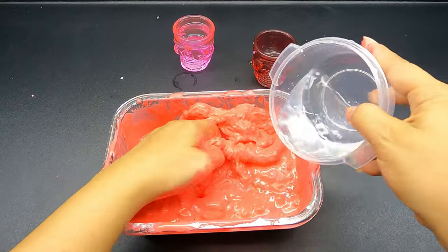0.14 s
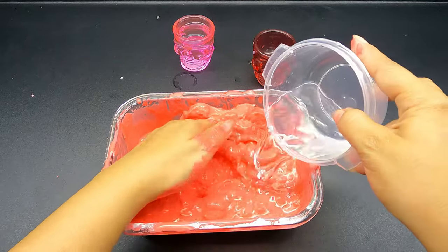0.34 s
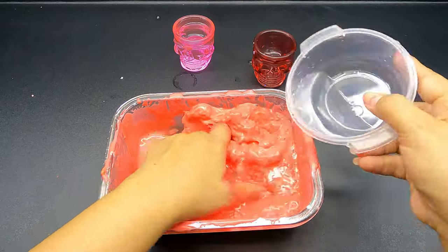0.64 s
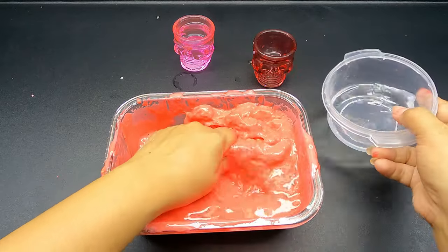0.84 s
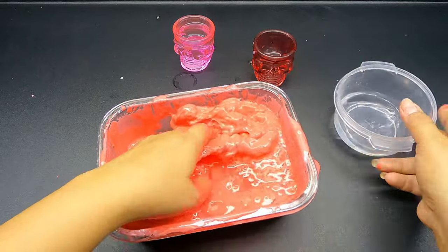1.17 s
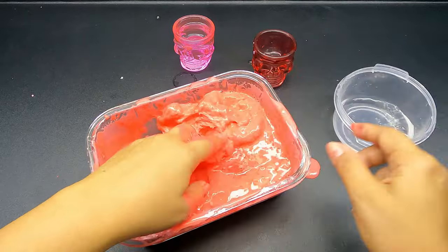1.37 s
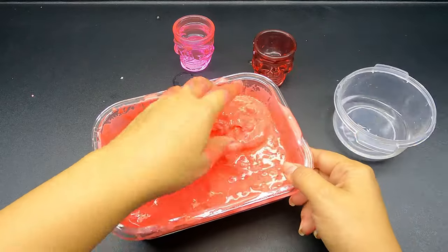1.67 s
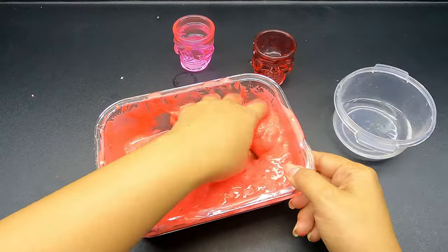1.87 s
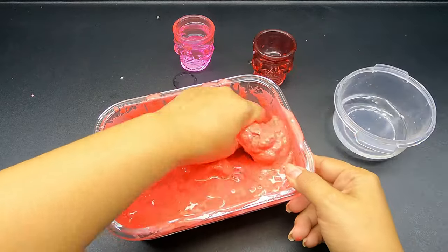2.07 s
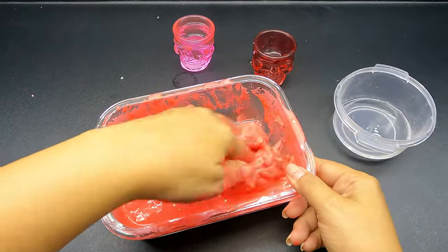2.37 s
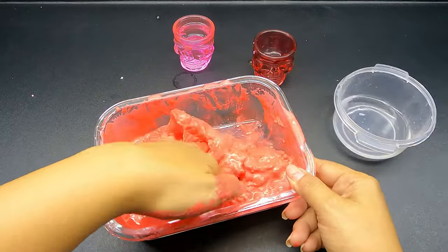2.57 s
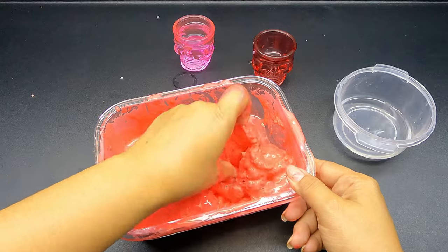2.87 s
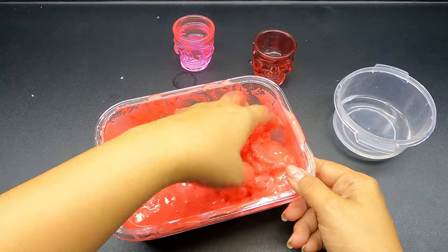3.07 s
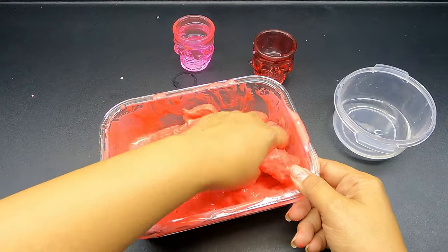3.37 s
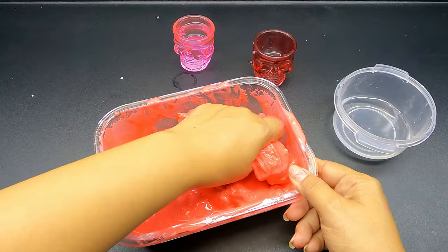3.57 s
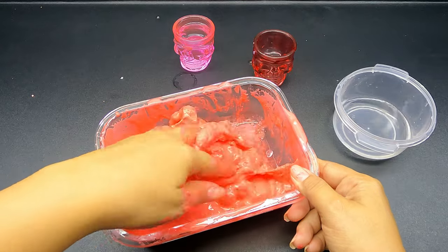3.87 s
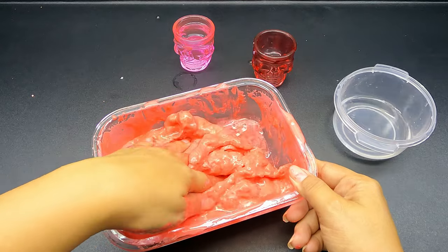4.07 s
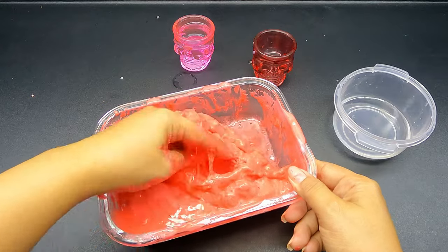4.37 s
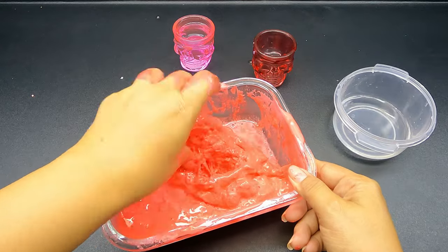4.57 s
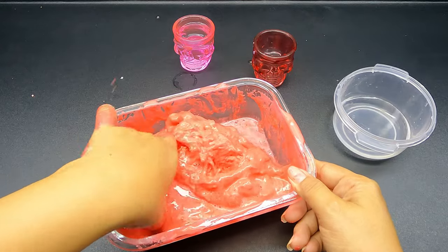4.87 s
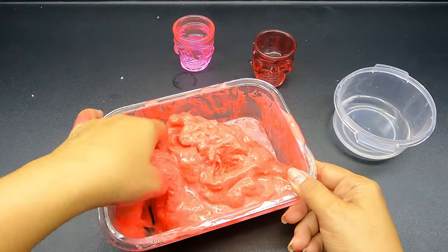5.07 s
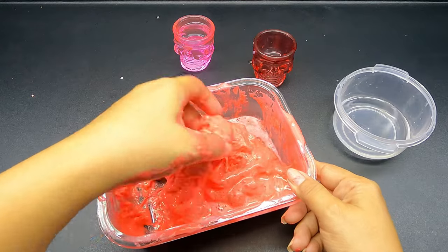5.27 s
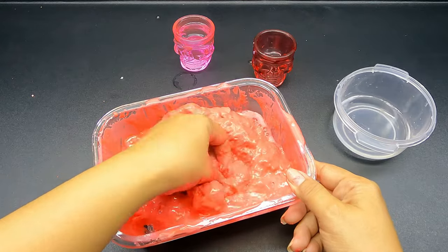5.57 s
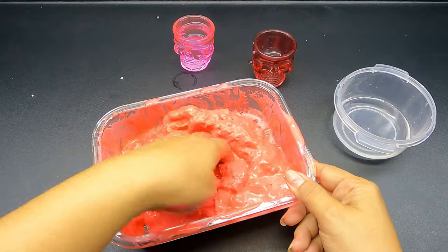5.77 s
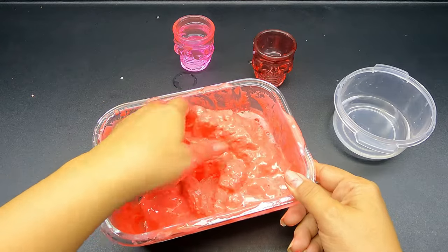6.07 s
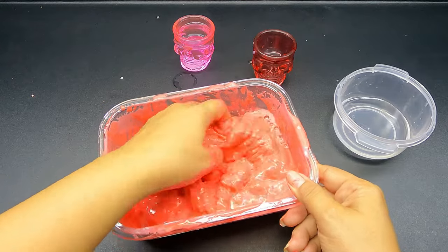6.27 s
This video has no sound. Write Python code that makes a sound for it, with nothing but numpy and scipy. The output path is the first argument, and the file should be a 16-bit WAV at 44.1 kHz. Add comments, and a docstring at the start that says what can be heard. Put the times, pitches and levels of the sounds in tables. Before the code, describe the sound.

Hands knead wet, sticky slime in a glass dish, heard very close in stereo in a small quiet room with a faint hush and short reverberation. Soft clicks and pops open at 0.1-0.25 s, then a lull. From 0.75 s squelches build, with pops near 1 s and a dense wet cluster of plops, snaps and low table bumps at 1.2-1.55 s. A sharp pop comes at 2.2, then deeper plops with a knock and drag at 2.33-2.4. Lighter gurgles and clicks follow, with a bright snap at 2.94. Small pops and fizzing crackles run 3.4-3.9, another snap at 4.13 and strong pops around 4.5. A heavy low boom lands at 4.93, a smaller bump and plop at 5.23. A sharp snap at 5.65 leads to the loudest crackling bursts at 5.9-6.0, then fading squelches, a low drag and a final bump near 6.4.

```python
"""Wet slime is kneaded by hand in a glass dish on a hollow table, close to a stereo microphone in a small quiet room.
Air pockets burst as short rising rings, sticky films tear as bright noise bursts, and under every squeeze
showers of tiny damped rings gurgle and fizz. The dish and a plastic bowl bump and drag on the table,
whose top booms in decaying modes. Noise tails make the room answer, over a faint hush."""
import sys
import numpy as np
from scipy import signal
from scipy.fft import rfft, irfft, next_fast_len
from scipy.io import wavfile
from scipy.ndimage import uniform_filter1d

SR = 44100
rng = np.random.default_rng(int(sys.argv[2]) if len(sys.argv) > 2 else 0)


def materialize(psi):
    """Save the field psi as 16-bit PCM at rate SR to the path in sys.argv[1].

    A 1-D psi becomes a single channel; in a 2-D psi each row is a channel.
    """
    bounded = np.clip(np.atleast_2d(psi).T, -1, 1)
    quanta = np.round(bounded * 32767).astype(np.int16)
    wavfile.write(sys.argv[1], SR, quanta)


def elevation(decibels):
    """Turn decibel levels (scalar or array-like) into linear amplitude ratios."""
    levels = np.asarray(decibels, float)
    return 10 ** (levels / 20)


N = 283563  # length in samples
LEAD = 0.03  # room for a swell before its peak (s)


def unit(x):
    """Scaled to rms 1."""
    return x / np.sqrt(np.mean(x ** 2) + 1e-20)


def along(points, hz):
    """(Hz, value) points joined on a log frequency axis."""
    point_hz, value = np.transpose(points)
    return np.interp(np.log(hz + 1), np.log(point_hz + 1), value)


def filtered(x, response):
    """x shaped by a gain that is a function of frequency."""
    size = next_fast_len(x.shape[-1] + 2 * SR)
    spectrum = rfft(x, size) * response(np.fft.rfftfreq(size, 1 / SR))
    return irfft(spectrum, size)[..., :x.shape[-1]]


def add(track, s, sound):
    """Lays a sound into a track at a time in seconds."""
    start = round(s * SR)
    track[..., start:start + sound.shape[-1]] += sound


def sides(pan_db):
    """Left and right gains, pan_db apart."""
    return elevation(np.array([[0.5], [-0.5]]) * pan_db)


def lump(t, swell_ms, fade_ms):
    """Envelope that swells up to t = 0 and fades after, with time constants in ms."""
    time_ms = np.where(t < 0, max(swell_ms, 0.1), max(fade_ms, 0.3))
    return np.exp(-np.abs(t) * 1000 / time_ms)


def strokes(rows, rise_db_per_s, fall_db_per_s):
    """Level curves (dB) of strokes that rise, hold and fall; overlapping ones add in power."""
    rest_db = -76  # floor between strokes
    t = np.arange(0, N, 32)[:, None] / SR
    start, hold, *levels = np.transpose(rows)
    before = np.clip(start - t, 0, None)
    after = np.clip(t - start - hold, 0, None)
    off_db = rise_db_per_s * before + fall_db_per_s * after
    curves = []
    for db in levels:
        power = np.sum(elevation(db - off_db) ** 2, 1) + elevation(rest_db) ** 2
        curves.append(np.interp(np.arange(N) / SR, t[:, 0], 10 * np.log10(power)))
    return curves


def plops():
    """A bursting pocket rings as a small cavity whose pitch rises as it opens; the wet walls make the ring ragged."""
    # Air pockets bursting, and just after the bumps at 2.33 s and 5.23 s a few rows of the bumped dish
    # rattling. Each row: peak time in seconds, level in dB, cavity pitch at the peak in Hz, # length in ms.
    bursts = [(0.1535, -27.5, 1410, 0.82), (0.1808, -37.5, 1300, 2.3), (0.198, -37.5, 1390.0, 1.3),
              (0.224, -38.5, 1800, 1.6), (0.7407, -39.5, 1430, 3.3), (0.8213, -34, 1570.0, 2.5),
              (0.907, -39, 1520.0, 3.1), (0.9186, -33.5, 1840, 1.7), (0.9216, -36, 1530.0, 1.1),
              (0.9503, -32, 1300, 2.7), (0.9696, -29.7, 1680, 2.2), (0.979, -22.8, 1657, 2.2),
              (0.9967, -28.5, 1700, 1.5), (1.046, -29.5, 1520.0, 2.6), (1.11, -39, 1500, 1.5),
              (1.1225, -38, 1520, 2.5), (1.1707, -30.5, 1330, 2.3), (1.2169, -19.5, 1390, 0.82),
              (1.2939, -30, 1510, 3.6), (1.3646, -29.2, 1380, 1.4), (1.3882, -19, 1240, 4.7),
              (1.409, -28.4, 1640, 1.6), (1.4129, -26, 1610, 2.0), (1.4327, -29.5, 1340, 4.7),
              (1.5208, -28.5, 1550, 1.3), (1.562, -30, 1780, 0.88), (2.1213, -33.5, 1680, 0.9),
              (2.1407, -30.5, 1560, 2.4), (2.1796, -33, 1350, 2.5), (2.1897, -14.5, 1610, 1.2),
              (2.194, -23, 1420, 0.57), (2.3321, -21.5, 976, 5.8), (2.336, -25, 1000, 2.5),
              (2.3714, -23, 1150, 2.7), (2.5237, -34, 1270, 1.3), (2.5454, -33.5, 1660, 2.4),
              (2.6337, -38.5, 1620, 1.9), (2.636, -35, 1200, 1.0), (2.6704, -35, 1400, 1.1),
              (2.6985, -37.5, 1540, 1.9), (2.779, -34.5, 1650, 1.2), (2.9387, -31.5, 1445, 2.8),
              (3.0796, -35.5, 1175, 4.4), (3.17, -34, 1820, 2.5), (3.325, -43.5, 1430, 3.6),
              (3.3679, -42, 1630, 2.8), (3.4145, -27, 1680, 4.7), (3.423, -30, 1540, 3.4),
              (3.502, -27, 1603, 4.1), (3.599, -27, 1500, 6.6), (3.6125, -24.5, 1645, 2.9),
              (3.7638, -31, 1330, 1.4), (3.7968, -23, 1590, 2.9), (3.8002, -26, 1140, 2.3),
              (3.8654, -35.5, 1260.0, 3.8), (4.0146, -38, 1750.0, 0.81), (4.0276, -34, 1240.0, 1.8),
              (4.1269, -30, 1850, 1.8), (4.4045, -33.9, 1440.0, 3.1), (4.4441, -30, 1250, 3.3),
              (4.4571, -24, 1350, 0.61), (4.4972, -19, 1607, 3.1), (4.6124, -28.5, 1850.0, 2.5),
              (4.829, -45, 1176, 5.9), (4.9007, -34.5, 1900, 1.2), (4.936, -30.5, 1050, 1.5),
              (5.2002, -36, 1160.0, 1.3), (5.23, -26, 1050, 3.6), (5.553, -36.5, 1940, 2.1),
              (5.6277, -37.5, 1830, 1.4), (5.652, -34, 1446, 3.4), (5.8082, -26, 1440.0, 2.7),
              (5.8921, -25, 1283, 3.3), (5.8974, -24, 1640.0, 0.54), (5.9375, -25, 1560, 0.92),
              (5.94, -21.1, 1347, 3.5), (5.9716, -36, 1300.0, 1.6), (5.974, -16.5, 1200, 1.7),
              (5.9781, -19, 1160.0, 0.59), (6.3426, -34.5, 1760, 3.8)]
    out = np.zeros((2, N + SR))
    t = np.arange(SR // 10) / SR - LEAD
    random = rng.standard_normal((len(bursts), 2, len(t)))
    for (s, db, hz, length_ms), jag in zip(bursts, random):
        slip = unit(uniform_filter1d(jag[0], size=50))
        ring = np.sin(2 * np.pi * hz * (t + 4 * t * t) + 0.96 * slip)
        shape = lump(t, swell_ms=0.22 * length_ms, fade_ms=length_ms)
        pan_db = jag[1, 0]
        add(out, s - LEAD, elevation(db) * sides(pan_db) * ring * shape)
    return out[:, :N]


def snaps():
    """A tearing film is a burst of crackle, brightest around a pitch set by its size."""
    # Sticky films tearing. Each row: peak time in seconds, level in dB, centre in Hz, breadth in octaves,
    # length in ms.
    tears = [(0.0523, -43, 4280, 0.89, 1.2), (0.1243, -40, 8380.0, 0.52, 1.6),
             (0.1543, -34.5, 4100, 0.73, 1.3), (0.1698, -30.2, 7500, 0.17, 0.95),
             (0.18, -26, 7200, 0.46, 1.1), (0.1981, -29, 4640, 0.36, 1.1), (0.238, -28.3, 4400, 0.53, 1.3),
             (0.555, -46, 5800, 0.37, 1.4), (0.6534, -40.5, 5600, 0.2, 1.5),
             (0.7404, -40.5, 6700, 0.34, 1.2), (0.7732, -38, 5320.0, 0.23, 0.8),
             (0.816, -31, 7800, 0.33, 1.3), (0.9437, -35, 3480.0, 0.7, 0.86), (0.969, -30, 3350, 0.65, 1.8),
             (1.0347, -37.5, 5100, 0.54, 1.7), (1.1442, -36.5, 6150.0, 0.43, 0.7),
             (1.17, -28.5, 3060, 0.42, 1.3), (1.1913, -26, 5200, 0.62, 1.0), (1.2154, -38, 2960, 0.44, 2.2),
             (1.253, -36, 5240.0, 0.65, 2.4), (1.2916, -32.5, 3900, 0.52, 3.8),
             (1.3314, -35.5, 2960, 0.45, 4.3), (1.3505, -31, 4250.0, 0.31, 1.6),
             (1.364, -28.5, 4000, 0.47, 2.6), (1.3863, -17, 5100, 1, 1.6), (1.4084, -28, 3580, 0.43, 1.8),
             (1.5215, -28, 4250, 0.98, 2), (1.5608, -25, 5460, 1, 2.8), (2.1885, -23, 3870, 0.2, 1.24),
             (2.3393, -30.5, 7040, 0.6, 1.9), (2.3845, -30.5, 7150.0, 0.54, 2.3),
             (2.397, -31.5, 7580.0, 0.49, 1.8), (2.546, -43, 2860, 0.2, 2.2),
             (2.6342, -38.5, 3620, 0.39, 1.1), (2.6985, -32.5, 3380, 0.47, 0.87),
             (2.7785, -29, 3940, 0.43, 0.8), (2.8609, -40, 3100, 0.42, 1.2),
             (2.9389, -22.5, 5880, 0.37, 1.3), (2.9421, -35, 6410.0, 0.81, 0.88),
             (3.324, -43, 3960, 0.84, 2.9), (3.3285, -34.5, 5100, 0.76, 0.52),
             (3.4, -36.5, 5320.0, 0.52, 1.5), (3.4705, -35.5, 3300, 0.26, 1.4),
             (3.5, -39, 5530.0, 0.31, 1.4), (3.5069, -42, 5910.0, 0.39, 1.1),
             (3.5194, -30, 6640, 0.33, 0.95), (3.539, -35, 5740, 0.47, 1.1),
             (3.5438, -27.5, 4770, 0.69, 0.44), (3.5522, -30, 5370, 0.65, 0.6),
             (3.599, -30, 6400, 0.5, 0.7), (3.6016, -30.5, 7490.0, 0.3, 2.8), (3.6055, -24, 5600, 0.7, 0.6),
             (3.7573, -29, 7390.0, 0.26, 1.6), (3.764, -19, 7100, 0.12, 0.96),
             (3.7957, -21.5, 5000, 0.84, 2), (3.8201, -32.5, 4700.0, 0.27, 2.1),
             (3.8872, -30.5, 8400, 0.36, 1.0), (3.8899, -33.5, 5450, 0.74, 3.2),
             (3.9795, -43.3, 5440.0, 0.66, 1.7), (4.003, -34, 3930, 0.15, 0.59),
             (4.0146, -31.5, 4150, 0.58, 1.1), (4.1275, -23.5, 4400, 0.66, 1.4),
             (4.4043, -39, 2880, 0.36, 1.6), (4.444, -31, 6300, 0.57, 3), (4.458, -28.5, 3600, 0.72, 1.8),
             (4.467, -29.9, 3000, 0.31, 1.6), (4.4968, -16, 3020, 0.36, 0.66),
             (4.5463, -31.5, 6060, 0.65, 1.3), (4.6026, -32.5, 5400, 0.14, 1.4),
             (4.6122, -31, 6900, 0.25, 2.4), (5.0905, -42, 5340, 0.36, 1.8),
             (5.1989, -47, 5270.0, 0.16, 1.6), (5.3012, -38, 5200, 0.56, 3.7),
             (5.502, -40, 4130, 0.42, 1.1), (5.5503, -38, 2920, 0.53, 2.1),
             (5.5559, -36.5, 5690.0, 0.39, 0.9), (5.5605, -37, 5000, 0.39, 0.9),
             (5.6292, -43, 5330.0, 0.55, 1.2), (5.6515, -20, 5400, 0.28, 1.32),
             (5.7439, -40, 6600, 0.56, 1.3), (5.8082, -22, 7460, 0.13, 1.4),
             (5.8926, -23.5, 8200, 0.9, 3.6), (5.9371, -17.5, 5190.0, 0.87, 1.1),
             (5.9397, -13.5, 4200, 0.76, 1.9), (5.9714, -17.5, 3900, 1, 1.8), (5.975, -15.8, 4170, 1, 1.8),
             (5.9907, -17.5, 4500, 0.27, 1.7), (6.3435, -32, 7000, 0.51, 1.06)]
    out = np.zeros((2, N + SR))
    t = np.arange(SR // 10) / SR - LEAD
    hz_grid = np.fft.rfftfreq(len(t), 1 / SR) + 1
    random = rng.standard_normal((len(tears), 2, len(t)))
    for (s, db, hz, octaves, length_ms), noise in zip(tears, random):
        away = np.log2(hz_grid / hz)  # octaves from the centre
        peak = np.exp(-0.5 * (away / max(octaves, 0.1)) ** 2)
        skirt = 0.06 * np.exp(-0.5 * (away / 2.9) ** 2)
        shape = lump(t, swell_ms=0.34 * length_ms, fade_ms=1.58 * length_ms)
        shared, apart = shape * irfft(rfft(noise) * (peak + skirt), len(t))
        strength = elevation(db - 2.5) * np.linalg.norm(shape) / np.linalg.norm(shared)
        add(out, s - LEAD, strength * (shared + 0.3 * apart * np.array([[1], [-1]])))
    return out[:, :N]


def grains(rate, hz, spread, cycles, size_db):
    """Stereo rain of tiny damped bubbles: random time, pitch, size and place, leaning right; rms 1."""
    # rate is in bubbles per second; each ring decays with a time constant of so many cycles
    at, pitch, size, place = rng.random((int(rate * N / SR), 4)).T[:, :, None]
    f = hz * np.exp(spread * (2 * pitch - 1))
    t = np.arange(256) / SR
    strength = elevation(-size_db * np.log(size + 0.0013))  # few large bubbles, many small
    ring = strength * np.sin(2 * np.pi * f * t) * np.exp(-t * f / cycles)
    index = ((at * N).astype(int) + np.arange(len(t))).ravel()
    pair = []
    for side in (1, -1):  # left, right
        placed = ring * elevation(side * 6.3 * (place - 1.0))
        pair.append(np.bincount(index, placed.ravel(), N + len(t))[:N])
    return unit(np.array(pair))


def squelch():
    """Under each squeeze countless small pockets gurgle and thin films fizz."""
    # Squeezes of the slime. Each row: start in seconds, hold in seconds, gurgle level in dB, fizz level in dB.
    squeezes = [(.16, 0.082, -58, -53.5), (.57, 0.0076, -63.5, -60.5), (.73, .12, -59, -54.5),
                (.92, 0.13, -52, -62), (1.18, 0.14, -46, -52.5), (1.34, 0.089, -42.5, -49.5),
                (1.53, 0.089, -56, -47), (1.79, 0.017, -62.5, -91), (1.94, 0.09, -54.5, -56),
                (2.1, 0.041, -55, -62), (2.2, 0.15, -52, -56.5), (2.33, 0.13, -52.5, -53),
                (2.54, 0.043, -50, -61.5), (2.66, 0.073, -60, -63.5), (2.88, 0.061, -50, -54.5),
                (2.97, 0.13, -59.5, -53), (3.17, 0.0067, -61, -56.5), (3.38, 0.097, -53.5, -55.5),
                (3.5, 0.13, -48.5, -56), (3.77, 0.047, -48, -41.5), (3.84, 0.061, -53.5, -52.5),
                (4.01, .13, -54, -57.5), (4.22, 0.2, -67, -63.5), (4.42, 0.035, -53, -52),
                (4.48, 0.052, -51.5, -55), (4.6, 0.05, -60.5, -56), (4.87, 0.064, -71, -59),
                (5.0, 0.24, -68, -69.5), (5.24, 0.097, -54, -58), (5.48, 0.15, -61, -60.5),
                (5.63, 0.18, -67.5, -73), (5.8, 0.058, -63, -58.5), (5.9, 0.12, -51.5, -49),
                (6.22, .21, -55.5, -64), (6.34, 0.1, -77, -57.5)]
    # Colours of the gurgling pockets and the fizzing films. Each row: frequency in Hz, relative level in dB.
    gurgle_colour = [(500, -3), (900, -13), (1200, 1.5), (1600, -3), (2200, 0), (3200, -4.5), (6000, -6)]
    fizz_colour = [(1500, -1), (2500, -7), (4500, -1), (6500, 2.5), (9300, -1.5), (10300, -4.5), (13000, 7),
                   (15500, -18), (16400, -42)]
    gurgle_db, fizz_db = strokes(squeezes, rise_db_per_s=474, fall_db_per_s=251)
    gurgle = grains(1800, hz=1390, spread=0.7, cycles=4.2, size_db=3.6)
    fizz = grains(5000, hz=6000, spread=0.95, cycles=2.6, size_db=5.2)
    gurgle = unit(filtered(gurgle, lambda hz: elevation(along(gurgle_colour, hz))))
    fizz = unit(filtered(fizz, lambda hz: elevation(along(fizz_colour, hz))))
    return elevation(gurgle_db) * gurgle + elevation(fizz_db) * fizz


def dish(slime):
    """Sound from the slime in the dish dips near 700 Hz and lifts near 950 Hz; the top treble is softened too."""
    # Radiation of the slime. Each row: frequency in Hz, gain in dB.
    radiation = [(300, 0.5), (700, -7), (950, 2), (1200, 1), (20000, -6)]
    return filtered(slime, lambda hz: elevation(along(radiation, hz)))


def table():
    """Bumps ring the table top, hard ones up into its high modes; the dragged dish shakes the same modes steadily."""
    # Modes of the table top. Each row: frequency in Hz, relative level in dB, time to fall 60 dB in seconds.
    modes = [(47.27, -8.5, 0.95), (73, -34, 0.61), (103.5, -10, 0.86), (127.5, -2.5, 0.25),
             (144.27, 0.5, 0.69), (176.8, 4, 0.056), (220.3, -1, 0.38), (246, -13.5, 0.46),
             (332, -5.5, 0.14), (399.7, -10.5, 0.26), (495, -12.5, 0.13), (580.7, -19.5, 0.23),
             (665.5, -17, 0.12), (781, -36, 0.38), (1001, -29.5, 0.17), (1202, -24.5, 0.22),
             (1440, -45, 0.43), (1986, -39, 0.077)]
    # Bumps on the table, and at 5.969 s a fingernail knocking the dish, rung through the same modes. Each row:
    # # time in seconds, relative level in dB, hardness in dB towards the high modes, place in dB favouring the
    # # 220 Hz mode, splat in dB relative to the bump.
    bumps = [(0.154, -34.5, -33, 6.5, -19), (0.407, -35, -66, -12, -50), (1.166, -32, -25, 15, -5),
             (1.19, -17, -54, -19, -32.5), (1.29, -31.5, -13, 11, -3), (1.331, -33.5, 15.5, -8, -26),
             (1.385, -22.5, 3.5, -5, -16), (1.43, -28.5, 6, 15.5, -9), (2.014, -23.5, -46, 1.5, -29.5),
             (2.333, -20.5, 20.5, 15, -3.5), (2.929, -32, -23.5, 3.5, -18), (4.077, -36, -8.5, 2.5, -36),
             (4.46, -33, -9, -1.5, -7), (4.861, -33, -27, 6, -10.5), (4.933, -7.5, -15.5, -2.5, -22.5),
             (5.229, -18, 9, 1.5, -10), (5.902, -32.5, -33, 4.5, -17), (5.969, -45.5, 37, 15.5, -18),
             (6.165, -35, -54, -9, -35), (6.377, -25, -16, 3, -10.5)]
    # Colour of slime thrown about by a bump. Each row: frequency in Hz, relative level in dB.
    splat_colour = [(150, 7), (400, 9.5), (1000, -4.5), (2200, -13), (3500, -49), (8000, -40.5)]
    # The dish dragged over the table. Each row: start in seconds, hold in seconds, level in dB.
    drags = [(.18, 0.16, -51.5), (.75, 0.46, -66), (1.2, 0.11, -41), (1.32, 0.074, -32.5),
             (1.56, 0.038, -43.5), (1.75, 0.18, -57), (2.07, 0.078, -51), (2.38, 0.018, -31),
             (2.56, 0.087, -48), (2.9, 0.058, -55), (3.4, 0.1, -54.5), (3.58, 0.047, -51.5),
             (4.08, .05, -51), (4.2, 0.15, -58), (4.48, 0.085, -44), (4.97, 0.02, -31),
             (5.28, 0.049, -36.5), (5.5, 0.14, -54), (5.87, 0.072, -48.5), (6.18, 0.16, -44)]
    drag_db, = strokes(drags, rise_db_per_s=281, fall_db_per_s=138)
    out, splat = np.zeros(N + SR), np.zeros(N + SR)
    t = np.arange(SR) / SR
    hz, level_db, t60 = np.transpose(modes)[:, :, None]
    high = np.clip(np.log2(hz / 250) / 2, 0, 1)  # 0 up to 250 Hz, 1 from 1000 Hz
    main = np.arange(len(hz))[:, None] == 6  # the 220 Hz mode
    decay = elevation(level_db - 60 * t / t60) * (1 - np.exp(-t * hz / 0.52))
    tone = np.sin(2 * np.pi * hz * t)
    knots = rng.standard_normal((len(bumps), len(hz), 64))
    for (s, db, hard_db, place_db, splat_db), luck in zip(bumps, knots):
        tilt_db = high * (hard_db + 11 + 2.0 * luck[:, :1])
        weight = elevation(db - 8.5 + tilt_db + main * place_db)
        # the loose dish rattles on the top, so each ring wavers in phase, the high ones most
        waver = np.array([np.interp(t, np.arange(64) / 63, knot - knot[0]) for knot in luck])
        depth = 0.17 + 0.8 * high  # radians
        ring = np.sin(2 * np.pi * hz * t + depth * waver)
        add(out, s, np.sum(weight * decay * ring, 0))
        add(splat, s, elevation(db + splat_db - 60 * t / 0.23))
    noise = filtered(rng.standard_normal(N), lambda f: elevation(along(splat_colour, f)))
    spray = splat[:N] * unit(noise)
    # under the drag the modes are damped further
    shake = np.sum(elevation(-8 * high - 1.73 * main) * decay * tone, 0) * elevation(-60 * t / 0.15)
    rub = elevation(drag_db) * rng.standard_normal(N)
    drag = signal.fftconvolve(rub, shake / np.linalg.norm(shake))
    return out[:N] + spray + drag[:N]


def room(x):
    """The walls answer, each frequency dying at its own speed; a new tail for each short stretch of sound."""
    # Decay of the room. Each row: frequency in Hz, time to fall 60 dB in seconds.
    reverb_time = [(150, 0.35), (1000, 0.33), (5000, 0.33), (14000, 0.31)]
    out = np.zeros((2, N + 2 * SR))
    step = SR // 4
    for start in range(0, N, step):
        hz, t, z = signal.stft(rng.standard_normal((2, SR // 2)), SR, nperseg=256)
        fade = elevation(-60 * t / along(reverb_time, hz)[:, None])
        tail = signal.istft(z * fade, SR, nperseg=256)[1]
        tail = tail + 0.17 * tail.sum(0)  # close capsules share part of the tail
        tail = tail / np.linalg.norm(tail[0])
        wet = signal.fftconvolve(x[None, start:start + step], tail, axes=1)
        add(out, start / SR + 0.003, wet)
    return out[:, :N]


def room_tone():
    """Faint steady hush of coloured noise, more of it shared by both sides than apart."""
    # Colour of the quiet room. Each row: frequency in Hz, relative level in dB.
    hush_colour = [(25, -48), (50, 7), (90, -25.5), (150, 3.5), (220, 0), (630, -16), (900, -23.5),
                   (1200, -13), (3500, -37), (6000, -28.5), (9500, -35.5), (13000, -39), (16300, -67)]
    noise = rng.standard_normal((2, N))
    shared, apart = filtered(noise, lambda hz: elevation(along(hush_colour, hz)))
    return elevation(-61) * unit(shared + 0.67 * apart * np.array([[1], [-1]]))


def scene():
    """Slime and table, direct and through the room, over the room's hush."""
    slime = dish(plops() + snaps() + squelch())
    boom = table()
    to_room = elevation(-10.5) * slime.mean(0) + elevation(-21.5) * boom
    return slime + boom + room(to_room) + room_tone()


def band_limit(x):
    """A steep low-pass at the top of the band."""
    return signal.sosfilt(signal.butter(12, 16470, fs=SR, output="sos"), x)


def record(dry):
    """The capsules lose the deepest bass and highest treble and differ a little in colour."""
    # Response of both capsules. Each row: frequency in Hz, gain in dB.
    capsule = [(20, -22), (42, 0), (9000, 1.5), (11000, 0), (14000, -8.5), (16000, -21), (20000, -77)]
    # Difference between the capsules. Each row: frequency in Hz, left over right in dB.
    lean = [(100, 0.2), (600, 3.6), (1100, 2.2), (2200, 3.5), (6000, 1.5), (9000, 0.1), (13000, -3.5)]
    heard = filtered(dry, lambda hz: elevation(along(capsule, hz)) * sides(along(lean, hz)))
    return band_limit(heard)


dry = scene()
out = record(dry)
materialize(out)
```